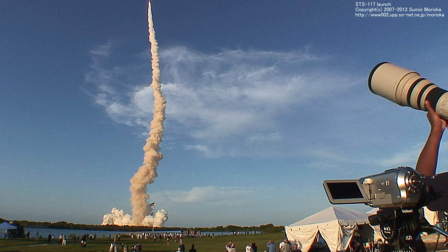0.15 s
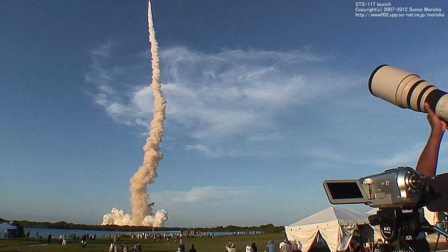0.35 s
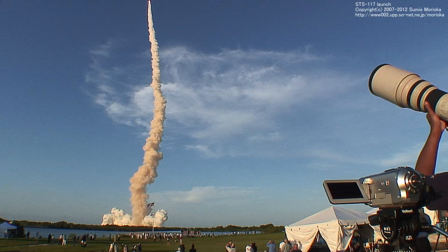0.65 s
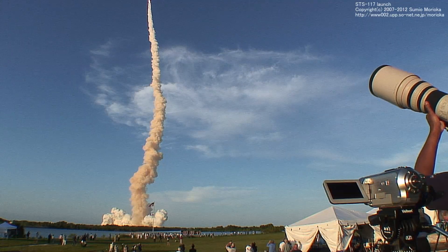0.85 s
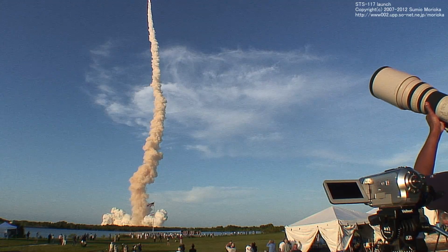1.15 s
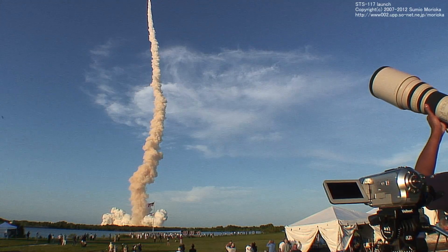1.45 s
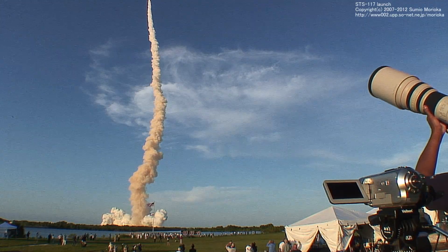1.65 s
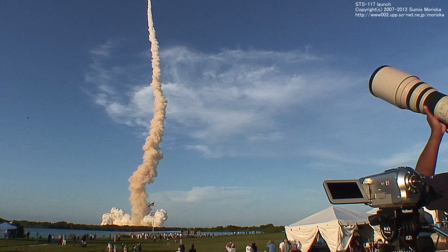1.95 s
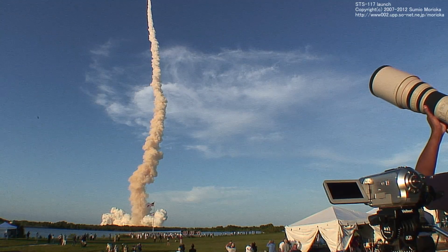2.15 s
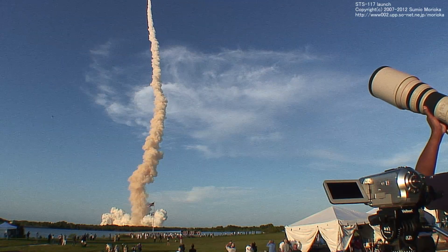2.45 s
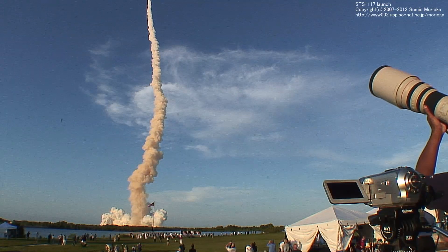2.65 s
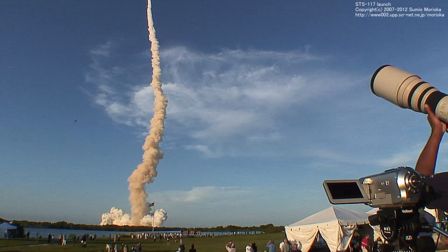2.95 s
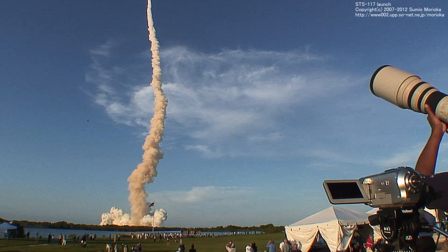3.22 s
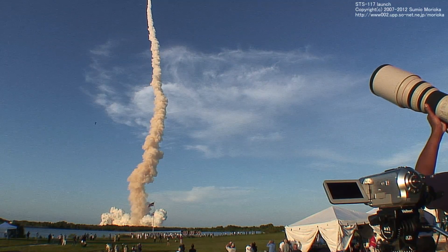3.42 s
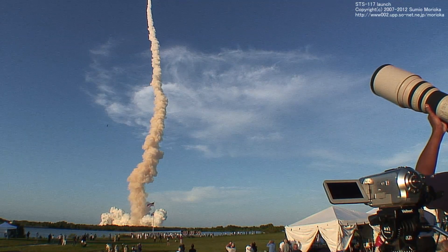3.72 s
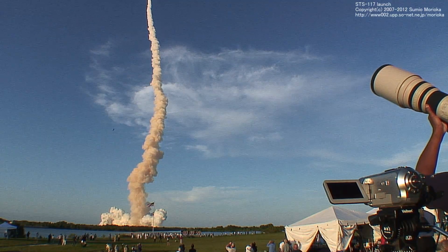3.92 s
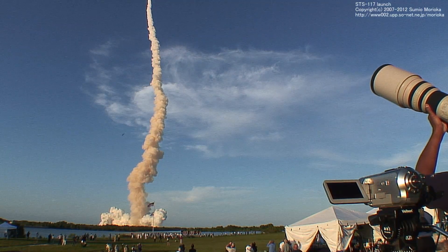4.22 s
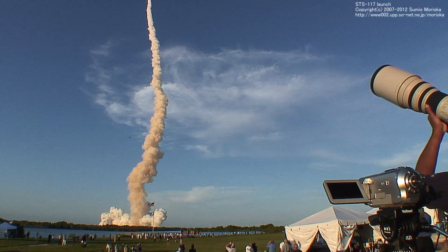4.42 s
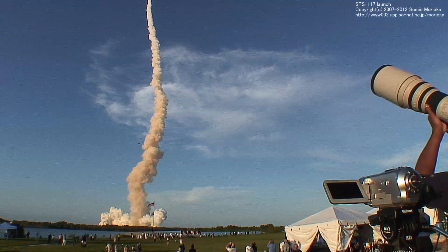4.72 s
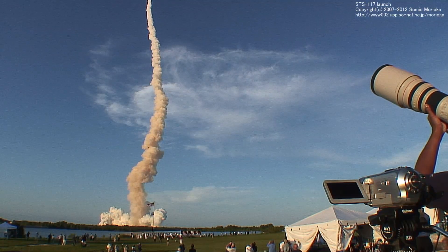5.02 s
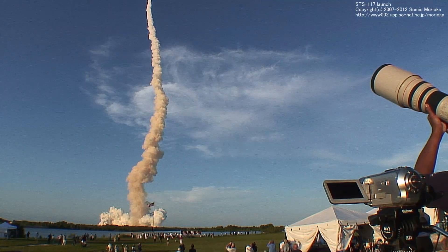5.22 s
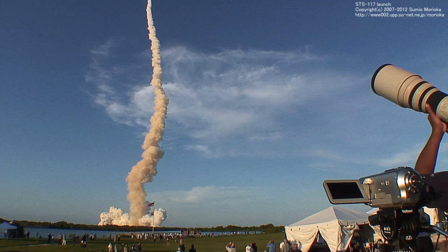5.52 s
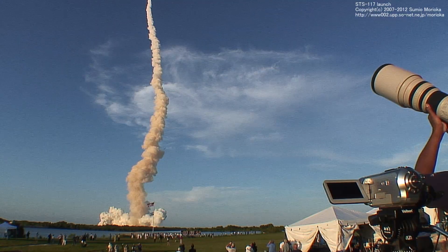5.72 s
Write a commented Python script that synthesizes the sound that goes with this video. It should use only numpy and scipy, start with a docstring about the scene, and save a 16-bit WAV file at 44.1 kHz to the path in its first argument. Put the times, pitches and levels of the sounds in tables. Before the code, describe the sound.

A distant climbing rocket crackles loudly and continuously, with sharp irregular pops over a deep rumble.

```python
"""A rocket climbs miles away; its roar has steepened into shock fronts that crackle over a deep rumble.
Each front comes straight down, then off the ground and nearby objects, then as a short scattered tail.
A faint diffuse roar lies behind. A small stereo microphone thins the fronts' bass, widens the image
and overloads on the strong fronts."""
import sys
import numpy as np
from scipy import signal
from scipy.fft import rfft, irfft
from scipy.io import wavfile
from scipy.ndimage import uniform_filter1d

SR = 44100
rng = np.random.default_rng(int(sys.argv[2]) if len(sys.argv) > 2 else 0)


def file_out(sig):
    """Save sig as 16-bit WAV at sys.argv[1]."""
    # one column per channel
    cols = np.atleast_2d(sig).T
    # limit, then scale
    lim = np.clip(cols, -1, 1)
    pcm = np.round(lim * 32767).astype(np.int16)
    wavfile.write(sys.argv[1], SR, pcm)


N = 258867
FRONT_SAMPLES = 1600

# prominent shock fronts: t/s, pressure jump/dB, rise time/ms
SHOCKS = [(.0063, 26.5, 0.11), (.025, 29, 0.041), (0.032, 18, .062), (.039, 28.5, .0084), (0.046, 22, 0.83),
          (0.0503, 14, .073), (0.0969, 29.5, 0.017), (.118, 15.5, .21), (0.1433, 27, .45),
          (0.171, 18.5, 0.099), (0.1765, 24, 0.13), (.214, 15, 0.1), (0.2509, 23, 0.041),
          (.2557, 21.5, 0.059), (0.2949, 29.5, 0.41), (0.2982, 26, 0.35), (0.3044, 23, 0.097),
          (0.3411, 25.5, 0.26), (0.3457, 26, 0.22), (0.3775, 24.5, 0.028), (.384, 15.5, .066),
          (.3987, 11, .19), (0.4236, 17.5, 0.047), (.451, 23.5, .23), (0.4724, 15.5, 0.11),
          (.5126, 24, 0.031), (0.5197, 23, 0.058), (0.5398, 20, 0.25), (.5521, 13, .4), (.5763, 22.5, 0.16),
          (0.5995, 16, 0.18), (.6128, 16.5, 0.18), (0.6281, 18, 0.15), (0.6648, 22, 0.085),
          (0.7276, 27.5, .057), (0.7304, 19, .24), (0.7475, 21, 0.43), (0.7704, 16, .2), (0.7889, 20, .1),
          (.7995, 22, 0.41), (0.8049, 20, .2), (0.8633, 25, 0.064), (0.8785, 17, 0.32), (0.9032, 12, 0.55),
          (.9134, 25.5, 0.045), (0.9325, 21.5, 0.34), (.9571, 19.5, 0.19), (0.99, 18, 0.62),
          (1.0112, 18.5, 0.15), (1.0228, 22.5, 0.25), (1.0261, 21, 0.72), (1.0378, 19.5, .76),
          (1.0501, 18.5, .14), (1.081, 19.5, 0.086), (1.095, 19, 0.12), (1.1117, 16, .1),
          (1.121, 27.5, 0.071), (1.1472, 16, 0.16), (1.1512, 19.5, 0.065), (1.1686, 17, 0.54),
          (1.178, 14, 0.31), (1.1903, 19, 0.13), (1.2151, 22, 0.074), (1.2356, 18, 0.35),
          (1.2811, 20, 0.12), (1.2963, 16, 0.15), (1.3301, 16.5, 0.21), (1.3586, 21, 0.27),
          (1.3821, 28.5, 0.24), (1.4234, 18.5, 0.089), (1.4462, 15.5, 0.3), (1.4787, 18, 1),
          (1.4979, 28, 0.84), (1.515, 19.5, 0.11), (1.5397, 24, 0.089), (1.598, 26.5, 0.033),
          (1.6203, 27, 1), (1.6527, 19, 0.077), (1.6725, 21.5, 0.27), (1.708, 15, .4), (1.7273, 15, 0.066),
          (1.7484, 13.5, .2), (1.771, 10, .3), (1.7904, 14.5, 0.091), (1.8117, 19, 0.091),
          (1.834, 18, 0.096), (1.8601, 22, 0.054), (1.9, 23.5, 0.059), (1.91, 17.5, 0.22),
          (1.9279, 15, 0.062), (1.952, 18.5, 0.09), (1.9656, 15, .2), (2.0073, 15.5, 0.27),
          (2.0124, 23.5, 0.034), (2.0275, 19, 0.7), (2.045, 14, 0.78), (2.08, 26, 0.04), (2.134, 25, 0.045),
          (2.174, 13, 0.096), (2.1789, 23.5, .84), (2.208, 28.5, 0.14), (2.241, 15, 0.074),
          (2.2449, 22, 0.16), (2.281, 14, 0.12), (2.3053, 26, 0.049), (2.3363, 20, 0.17),
          (2.3411, 25, 0.026), (2.3538, 17, 0.17), (2.4055, 22.5, 0.49), (2.4392, 13, .44),
          (2.4597, 26, 0.093), (2.4818, 22.5, .35), (2.5029, 13, 0.24), (2.5243, 11, 0.084),
          (2.557, 16, 0.49), (2.5696, 32, 1), (2.5778, 13, 0.08), (2.6251, 22.5, 0.24), (2.644, 12, 0.35),
          (2.6783, 22.5, 0.47), (2.709, 15.5, 0.13), (2.7202, 12, .15), (2.742, 17, 0.081),
          (2.7756, 17, 0.8), (2.7993, 20, .13), (2.8545, 14.5, 0.26), (2.886, 12.5, 0.18), (2.91, 19, 0.13),
          (2.9147, 23.5, 0.11), (2.925, 20.5, 0.33), (2.9668, 16, 0.22), (2.9745, 20.5, 0.1),
          (3.0026, 20.5, 0.13), (3.0861, 21, 0.13), (3.12, 23, 0.14), (3.1326, 21.5, 0.29),
          (3.1523, 19, 0.33), (3.157, 19.5, 0.056), (3.1865, 24.5, 1), (3.2136, 21, 0.17),
          (3.2332, 18.5, 0.088), (3.2544, 15, 0.18), (3.2684, 16, 0.18), (3.3169, 31, 0.3),
          (3.3299, 22, .56), (3.3352, 23, .76), (3.3407, 14, 0.13), (3.3588, 17, 0.66), (3.3706, 24, 0.11),
          (3.39, 17, 0.21), (3.3945, 22.5, 0.4), (3.4138, 31, 0.92), (3.4486, 20, 0.13), (3.4761, 16, 0.35),
          (3.4958, 24, 0.069), (3.5153, 24.5, 0.62), (3.5303, 23, 1), (3.5578, 17, .11), (3.5815, 14, .27),
          (3.6232, 20, 0.0357), (3.643, 17.5, 0.23), (3.6726, 24.5, .058), (3.6899, 14, 0.57),
          (3.7059, 22, 0.17), (3.7149, 20, 0.48), (3.7452, 18.5, 0.095), (3.7802, 14.5, 0.11),
          (3.816, 21, 0.48), (3.8249, 19.5, 0.61), (3.834, 20, 0.22), (3.8714, 25.5, .11),
          (3.924, 20, 0.93), (3.934, 16.5, 0.33), (3.9496, 10, 0.12), (3.9576, 15, 0.31),
          (4.0023, 19, 0.13), (4.0337, 18.5, 0.17), (4.0477, 15, 0.095), (4.059, 17.5, 0.13),
          (4.0666, 19, 0.11), (4.0966, 17.5, .11), (4.1088, 16, .57), (4.1416, 14.5, 0.26),
          (4.1662, 17, .79), (4.19, 23.5, 0.067), (4.2025, 15, 0.11), (4.2549, 14.5, .12),
          (4.281, 22.5, 0.068), (4.3013, 21, .86), (4.3179, 17.5, 0.02), (4.3479, 18.5, 0.044),
          (4.3689, 21, 0.054), (4.3879, 16, 0.55), (4.413, 18, 0.14), (4.4466, 26.5, 0.012),
          (4.4567, 21.5, 0.12), (4.5097, 27, 0.074), (4.5286, 18.5, 0.29), (4.5531, 19.5, 0.045),
          (4.6084, 16.5, 0.082), (4.6326, 17.5, .16), (4.6659, 24, 0.054), (4.7596, 15, 0.12),
          (4.7744, 21.5, 0.16), (4.8195, 16, 0.29), (4.834, 15.5, 0.099), (4.886, 6, .36),
          (4.9206, 14.5, 0.15), (4.9368, 20.5, 0.087), (4.9521, 15.5, .17), (4.9969, 16, 0.19),
          (5.0168, 11, .39), (5.044, 20.5, .16), (5.0513, 17.5, .2), (5.1214, 22, 0.16),
          (5.1453, 16, 0.071), (5.154, 15.5, 0.15), (5.2116, 15, 0.2), (5.2282, 15.5, 0.69),
          (5.2426, 13.5, 0.15), (5.2562, 23, .29), (5.3015, 19, 0.68), (5.3357, 15, 0.24),
          (5.3437, 17, .12), (5.3614, 15, 0.4), (5.3821, 20.5, 0.13), (5.419, 12, 0.23), (5.4275, 17, 0.65),
          (5.4457, 19.5, 0.099), (5.4536, 23, 0.9), (5.5023, 13, 0.2), (5.521, 14, 0.14),
          (5.5367, 16.5, .1), (5.5451, 24.5, 0.41), (5.584, 20, 0.67), (5.6362, 14, .3), (5.6465, 20, 0.14),
          (5.6667, 19, .98), (5.6892, 15, 0.32), (5.7112, 19, 0.75), (5.7342, 22, 1), (5.7393, 19.5, 0.24),
          (5.791, 23, 0.29), (5.8164, 18.5, 0.59), (5.8356, 19.5, 0.18)]


def shock_front(rise_ms, late_samples=0., fall_ms=5.8):
    """Sudden pressure jump that sinks back slowly; the capsule inverts it."""
    t_ms = np.maximum(np.arange(FRONT_SAMPLES) - late_samples, 0) * 1000 / SR
    u = t_ms / max(rise_ms, .01)
    jump = 1 - (1 + u) * np.exp(-u)
    return -jump * np.exp(-t_ms / fall_ms)


def shock_trains(rows, count):
    """One front per row, dealt in turn to several trains."""
    trains = np.zeros((count, N + FRONT_SAMPLES))
    for k, (t_s, jump_db, rise_ms) in enumerate(rows):
        i = int(t_s * SR)
        trains[k % count, i:i + FRONT_SAMPLES] += from_db(jump_db) * shock_front(rise_ms, t_s * SR - i)
    return trains[:, :N]


def lesser_fronts(roar_db, rate_hz=50, over_db=20, spread_db=5, rise_ms=.53, lull_s=.007):
    """Rows like SHOCKS for rounder fronts at uneven gaps; a strong front swallows those close to it."""
    gap, size, rise = rng.standard_normal((600, 3)).T
    t_s = np.cumsum(np.exp(.5 * gap - .125) / rate_hz)
    to_shock_s = np.abs(np.array(SHOCKS)[:, :1] - t_s).min(axis=0)
    keep = (t_s < (N - 1) / SR) & (to_shock_s > lull_s)
    jump_db = roar_db[(t_s[keep] * SR).astype(int)] + over_db + spread_db * np.clip(size[keep], -2, 2)
    rises_ms = rise_ms * np.exp(.8 * np.clip(rise[keep], -1, 2))
    return list(zip(t_s[keep], jump_db, rises_ms))


def small_fronts(roar_db, rate_hz=280, over_db=10, spread_db=3, rise_ms=.11):
    """Dense weak fronts at random moments."""
    sizes = from_db(spread_db * np.minimum(rng.exponential(1, N), 2))
    impulses = sizes * (rng.random(N) < rate_hz / SR)
    train = signal.fftconvolve(impulses - impulses.mean(), shock_front(rise_ms))[:N]
    return from_db(roar_db + over_db) * unit_rms(train)


def hush_db(dip_db=-4.5, lead_s=.025, above_db=19.5, hop=32):
    """The roar thins just ahead of the bigger fronts, which have overtaken it."""
    big_s = np.array([t_s for t_s, jump_db, _ in SHOCKS if jump_db > above_db])
    ahead_s = big_s[:, None] - np.arange(0, N, hop) / SR
    depth = np.where(ahead_s > 0, np.exp(-ahead_s / lead_s), 0).max(axis=0)
    return np.repeat(dip_db * depth, hop)[:N]


def arrivals(fronts):
    """Direct path plus dulled echoes off the ground and nearby objects, at each microphone port."""
    # paths to each port: delay/ms, level/dB, low-pass corner/Hz
    left_paths = [(0, 0, 30000), (4.09, -6.2, 450), (6.1, -23.4, 1030), (9.4, -29.3, 1030),
                  (11.17, -38.8, 1030), (14.18, -37.7, 1030), (17.62, -29.4, 1030)]
    right_paths = [(.01, -1, 30000), (4.12, -15.5, 1500), (4.4, -10.7, 450), (5.49, -24.2, 1030),
                   (7.83, -27.3, 1030), (8.71, -17, 1030), (10.36, -25.3, 1030), (11.83, -27.7, 1030),
                   (13.13, -25.6, 1030), (17.43, -22.2, 1030)]
    f_hz = np.fft.rfftfreq(4096, 1 / SR)
    ports = []
    for paths in (left_paths, right_paths):
        response = sum(from_db(db) * np.exp(-2j * np.pi * f_hz * ms / 1000) / (1 + 1j * f_hz / corner_hz)
                       for ms, db, corner_hz in paths)
        ports.append(signal.fftconvolve(fronts, irfft(response))[:N])
    return np.array(ports)


def scatter(trains, ground_echo_s=.00409, tail_db=-48, tail_t60_s=.2, near_over_db=4, near_t60_s=.055):
    """Dying noise after the ground echo; moving air gives each train and port its own pattern."""
    # tail spectrum: f/Hz, relative density/dB
    spectrum = [(100, -16), (250, -22), (600, -7.5), (1500, -8), (4000, -10.5), (12000, -21.5)]
    age_s = np.arange(6000) / SR - ground_echo_s
    noise = crossfeed(from_db(tail_db) * coloured_noise(spectrum, (len(trains), 2, 6000)), .42)
    tail = noise * from_db(-60 * age_s / tail_t60_s)
    # things close by scatter brighter and shorter
    near = highpass(noise, 1940) * from_db(near_over_db - 60 * age_s / near_t60_s)
    responses = (tail + near) * (age_s > 0)
    return signal.fftconvolve(trains[:, None], responses, axes=2)[..., :N].sum(axis=0)


def rumble(contour_db, gain_db=-2.5, side_db=-15.5):
    """The rocket's deep noise, nearly alike at both ports."""
    # rumble spectrum: f/Hz, relative density/dB
    spectrum = [(12, -72), (20, -23), (40, 7.5), (75, -2.5), (91, -2), (118, -3), (130, -0.5), (170, -38.5),
                (290, -120)]
    mid, side = coloured_noise(spectrum, (2, N))
    return from_db(contour_db + gain_db) * (mid + from_db(side_db) * side * [[1], [-1]])


def diffuse_roar(dip_db, gain_db=-37):
    """Faint, wide noise from afar."""
    # roar spectrum: f/Hz, relative density/dB
    spectrum = [(100, -48.5), (200, -14), (400, -13), (1000, -2), (3000, -4.5), (5500, -18), (9000, -34.5),
                (16500, -62.5)]
    return from_db(gain_db + dip_db) * crossfeed(coloured_noise(spectrum, (2, N)), .37)


def bass_cuts(ports):
    """Microphone and wind filter: each turns a step into a short dip and a swing back."""
    # second-order high-passes: f/Hz, Q
    cuts = [(149, .83), (78, .31)]
    for f_hz, q in cuts:
        omega = 2 * np.pi * f_hz
        ports = signal.lfilter(*signal.bilinear([1, 0, 0], [1, omega / q, omega ** 2], SR), ports)
    return ports


def overload(x, knee=8., flip_depth=1.784, flip_lead=1, flip_share=.848):
    """Soft clip at +-1; a side far under both the lower rail and the other side snaps to the upper rail."""
    clipped = x / (1 + np.abs(x) ** knee) ** (1 / knee)
    drive = highpass(x, 93.5, order=2)   # the deep rumble takes no part
    beyond = np.minimum(-drive - flip_depth, flip_share * drive[::-1] - drive - flip_lead)
    return clipped + (1 - clipped) * np.clip(10 * beyond, 0, 1)


def preamp_noise(x, hiss_db=-70.5, fizz_db=-44, window_s=.0032):
    """Steady hiss plus a fizz that follows the signal power."""
    power = uniform_filter1d(x ** 2, int(window_s * SR))
    return (from_db(hiss_db) + from_db(fizz_db) * power) * crossfeed(rng.standard_normal(x.shape), .11)


def coloured_noise(spectrum, shape):
    """Unit-rms noise shaped by rows of f/Hz, relative density/dB."""
    f_hz, level_db = np.transpose(spectrum)
    bins_hz = np.maximum(np.fft.rfftfreq(shape[-1], 1 / SR), 1)
    gain = from_db(np.interp(np.log(bins_hz), np.log(f_hz), level_db, right=-90))
    return unit_rms(irfft(rfft(rng.standard_normal(shape)) * gain, shape[-1]))


def highpass(x, f_hz, order=1):
    return signal.lfilter(*signal.butter(order, f_hz, "high", fs=SR), x)


def crossfeed(x, share):
    return x + share * x[..., ::-1, :]


def unit_rms(x):
    return x / np.sqrt(np.mean(x ** 2) + 1e-20)


def from_db(db):
    return 10 ** (np.asarray(db) / 20)


def scene():
    """Fronts through the surroundings and bass cuts, plus rumble and diffuse roar."""
    # roar between the shocks: t/s, weak-front level/dB, rumble level/dB
    contour = [(0.0, -4, -10), (.1, -9.5, -13.5), (0.3, -10.5, -15.5), (0.7, -8.5, -22), (1.1, -8, -24),
               (1.5, -8, -20), (1.9, -10, -21), (2.3, -12, -17.5), (2.6, -9, -23), (3.0, -13.5, -16.5),
               (3.5, -10.5, -23.5), (4.0, -12, -20), (4.45, -11, -15.5), (4.74, -11, -21.5),
               (5.3, -11, -25.5), (5.87, -9, -23)]
    t_s, *levels_db = np.transpose(contour)
    roar_db, rumble_db = (np.interp(np.arange(N) / SR, t_s, db) for db in levels_db)
    dip_db = hush_db()
    trains = shock_trains(SHOCKS + lesser_fronts(roar_db), count=6)
    trains[0] += small_fronts(roar_db + dip_db)
    crackle = bass_cuts(arrivals(trains.sum(axis=0)) + scatter(trains))
    return crackle + rumble(rumble_db) + diffuse_roar(dip_db)


def record(dry, widen=.814, widen_hz=146, rail=.985, cutoff_hz=16400):
    """Each side has the other subtracted above the bass to sound wider; then overload, hiss, top cut."""
    wide = dry - widen * highpass(dry, widen_hz)[::-1]
    clipped = overload(wide / rail)
    coupled = highpass(rail * clipped + preamp_noise(clipped), f_hz=8)   # output capacitor
    top_cut = signal.cheby2(12, 20, cutoff_hz, fs=SR, output="sos")
    limited = np.clip(signal.sosfilt(top_cut, coupled), -1, 1)
    return signal.sosfilt(top_cut, limited)


dry = scene()
out = record(dry)
file_out(out)
```